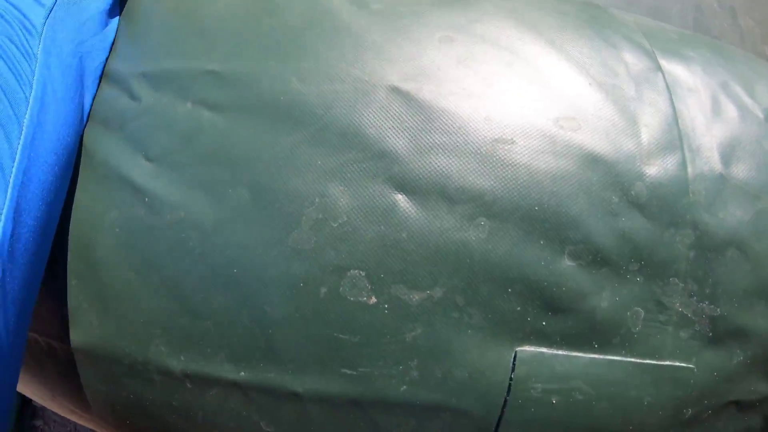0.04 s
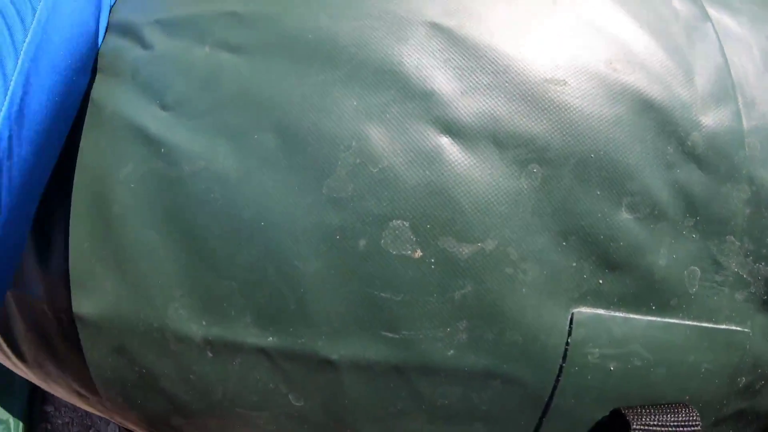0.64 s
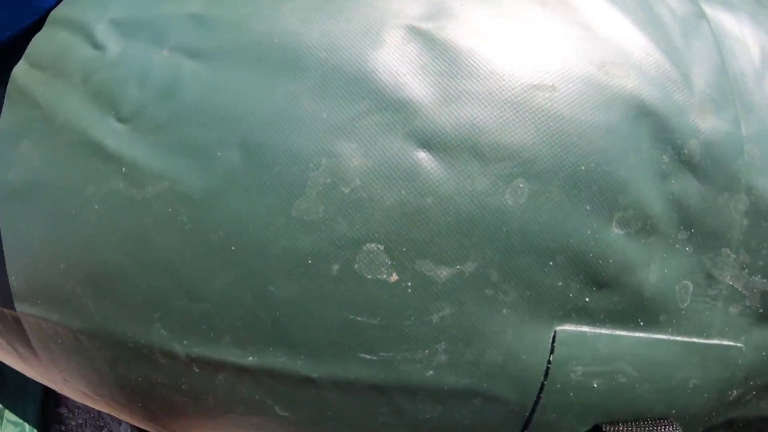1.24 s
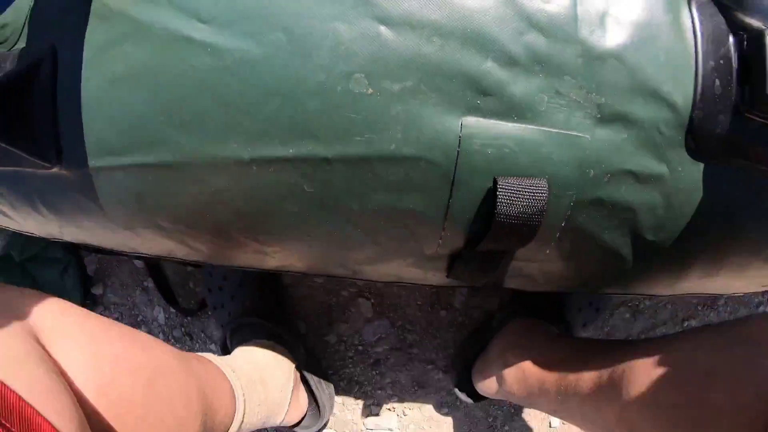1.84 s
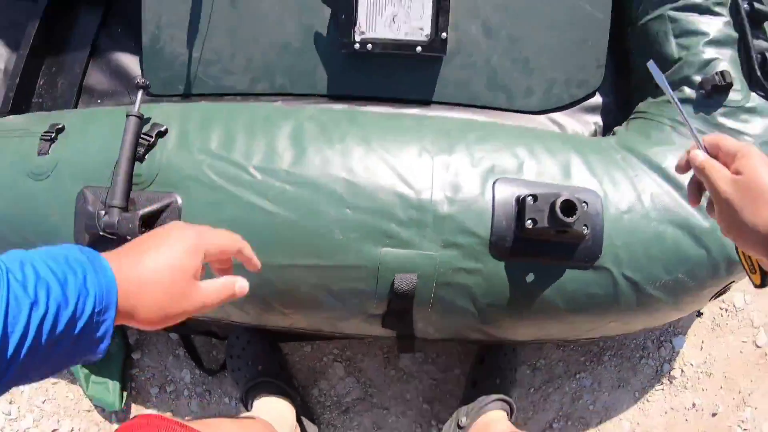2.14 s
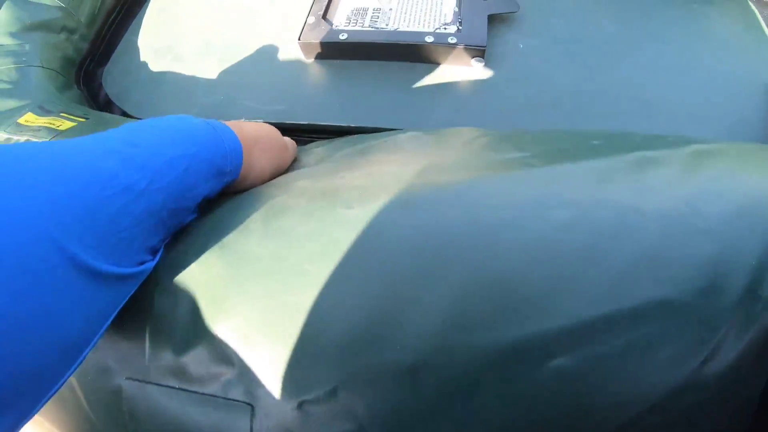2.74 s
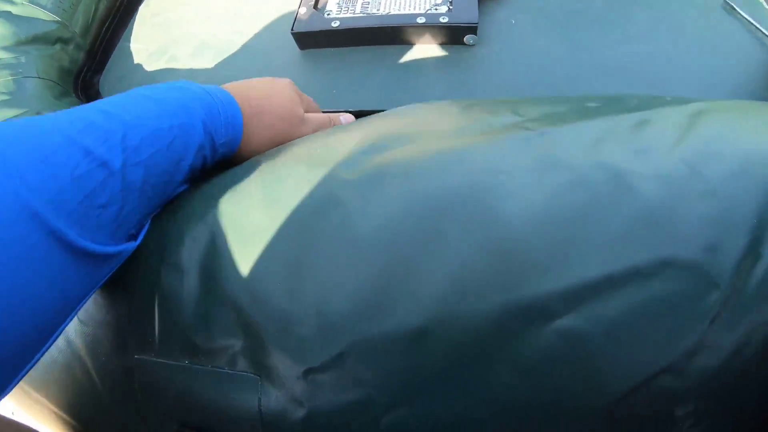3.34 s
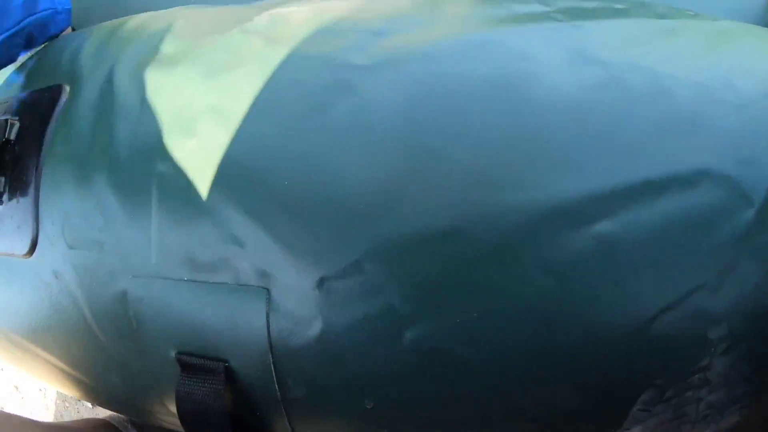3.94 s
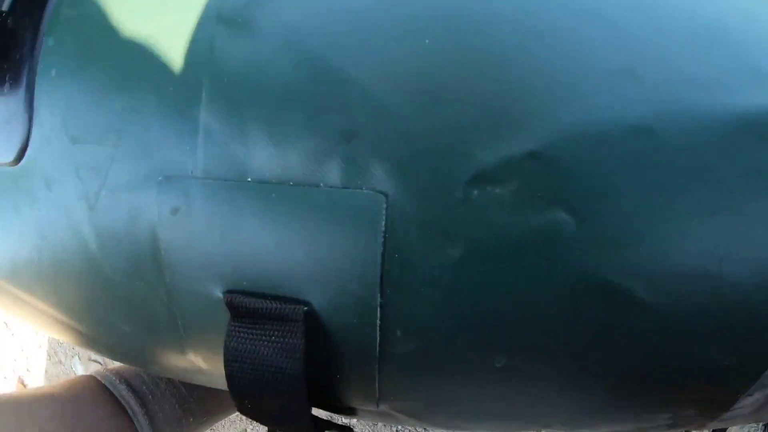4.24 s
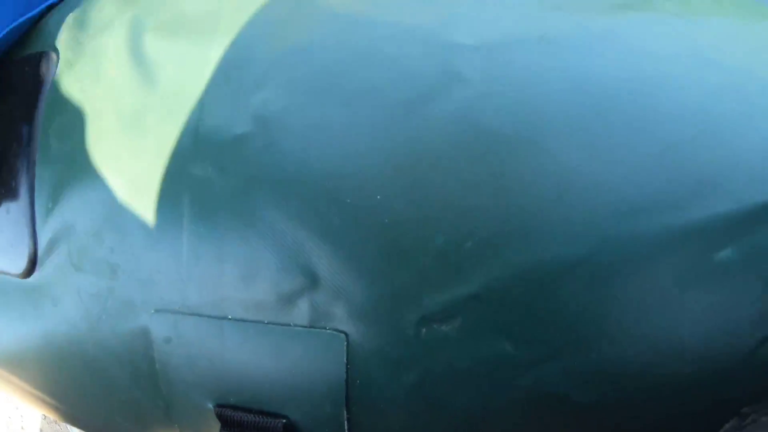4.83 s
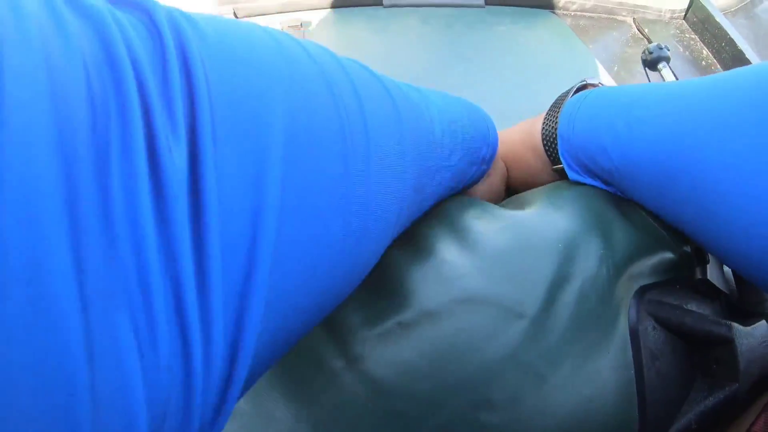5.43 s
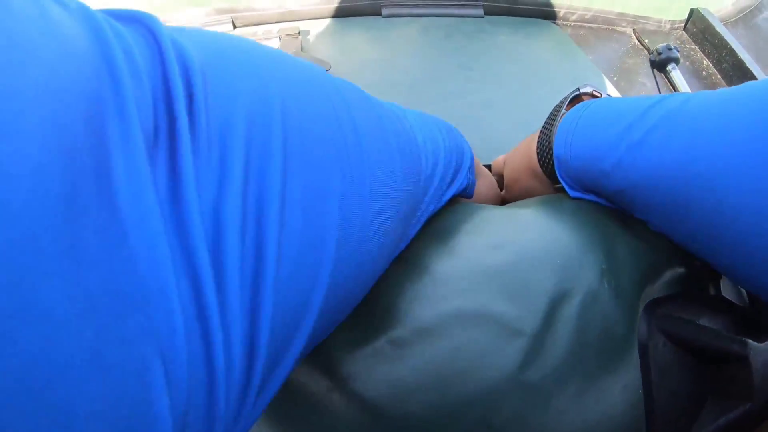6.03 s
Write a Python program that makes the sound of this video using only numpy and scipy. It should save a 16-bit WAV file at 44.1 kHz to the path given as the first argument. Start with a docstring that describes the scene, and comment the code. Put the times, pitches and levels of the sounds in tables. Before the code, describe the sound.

Close hands drag and slip on an inflatable boat, making sharp snaps, hollow thumps and skids over swishing cloth and low wind.

```python
"""Lake shore, microphone close to an inflatable boat; someone works both hands along its plastic tube.
In the first second and a half the skin drags, slips and snaps, and the air inside booms. Sleeves swish,
arms bump the tube, and the sound opens from mono to stereo just before a faint squeak at 2.7 s. Hard snaps
and a surge of low rumble come at 3.2 s, a long skid at 4.6 s, a creak at 5.2 s. The last bumps and snaps
are in mono again. Wind rumbles on the microphone throughout."""
import sys
import numpy as np
from scipy import signal
from scipy.io import wavfile

SR = 44100
rng = np.random.default_rng(int(sys.argv[2]) if len(sys.argv) > 2 else 0)


def dump(signal):
    """Clip the signal to [-1, 1] and save it as 16-bit WAV at the path in sys.argv[1]."""
    limited = np.clip(np.atleast_2d(signal).T, -1, 1)
    pcm = np.round(limited * 32767).astype(np.int16)
    wavfile.write(sys.argv[1], SR, pcm)


N = 272538

# the taut skin snaps or is tapped: start_s, level_db, favoured_hz, crack_db, slip_s
SNAPS = [(0.0293, -0.5, 1240, -10, 0.0036), (0.034, 2.5, 1370, -32, 0.0042), (0.205, -25.5, 1110, 5, 0.001),
         (0.288, -13.5, 1170, -12.5, 0.0074), (0.474, -19, 1060, -7.5, 0.0015), (.6605, -23, 840, -7, .001),
         (0.9938, -0.5, 1610, -7.5, 0.0048), (1.038, -14, 1720, -4.5, 0.012),
         (1.096, -13.5, 1120, -9, 0.0023), (1.3275, -2.5, 1570, -12, 0.0044), (1.399, -24, 1610, -2, .005),
         (1.66, -31, 1700, 8, 0.003), (2.432, -17, 1130, -17, .001), (2.814, -15, 1740, -2, 0.0098),
         (2.978, -27, 4000, 6, 0.00066), (3.1929, -1.5, 1160, -8, 0.00083), (3.227, 3, 1700, -8, 0.00046),
         (3.363, -5, 1270, -18, 0.002), (3.4397, -9, 1400, -12, 0.0011), (3.655, -30, 1320, 1.5, .001),
         (3.737, -22.5, 1570, -0.5, 0.00051), (4.233, -20, 1680, -2, 0.00069),
         (4.526, -11, 1180, -10, .003), (4.539, -12.5, 1070, -4.5, .0005), (4.63, -13, 1110, -22, .002),
         (4.682, -19, 815, -19, .004), (5.533, -21.5, 600, -25, .004), (5.6735, -7.5, 1150, -15, 0.00088),
         (5.868, -12, 1160, -20, 0.00096)]
# modes of the plastic skin: pitch_hz, level_db, t60_s
SKIN_MODES = [(666, 12.5, 0.044), (835, 1.5, 0.073), (976, 4.5, 0.022), (1170, -5, 0.054),
              (1303, -0.5, 0.045), (1560, 1.5, 0.028), (1740, -4.5, 0.029), (1894, -7, 0.048),
              (2446, -2.5, 0.036), (2650, 3.5, 0.038), (3350, 7, 0.064), (3500, -3, 0.036),
              (3940, 7, 0.042), (5600, -6.5, 0.01)]
# the tube is released: start_s, level_db, favoured_hz, contact_s, tension_ratio
BOOMS = [(0.02, -12, 192, 0.0054, 0.97), (0.996, -3, 426, 0.0051, 1.02), (1.036, -14, 171, 0.0084, 0.95),
         (1.329, -6.5, 222, 0.0064, 0.99), (1.341, -9, 342, 0.0041, 0.87)]
# modes of the air-filled tube: pitch_hz, level_db, t60_s, sag_ratio
TUBE_MODES = [(168.6, -0.5, 0.34, 0.21), (340, -17, 0.43, 0.044), (362.2, 2, 0.17, 0.015),
              (562, -7.5, 0.069, .03), (633, -10.5, 0.16, 0.03), (815, -1.5, 0.043, 0.056)]
# arms bump the tube close to the microphone: time_s, level_db, pitch_hz, swing_cycles
BUMPS = [(0.034, -10, 214, 0.82), (0.081, -11, 182, 0.72), (0.122, -3.5, 233, 1.4), (0.167, -9.5, 178, 2.6),
         (0.264, -19, 246.7, 1), (0.398, -9, 225, 0.85), (0.618, -18.5, 271.6, 1.7),
         (0.665, -11, 336, 0.72), (0.714, -20.5, 281, 2), (1.04, -12.5, 253, 2.5),
         (1.109, -16, 194.4, 0.88), (1.136, -20.5, 120, 1.3), (1.23, -21, 226, 1.7), (1.458, -16, 177.5, 2),
         (1.665, -19, 313.5, 1.1), (2.047, -20.5, 120.4, 0.64), (2.129, -18, 172, 0.67),
         (2.355, -19, 119.5, 1.1), (2.404, -17.5, 157.4, 1.35), (2.684, -9, 126, 0.31),
         (2.821, -15.5, 169, 1.3), (2.984, -9, 167.5, 0.35), (3.03, -14, 170, 0.41), (3.119, -17, 128, 1.3),
         (3.2, -7.5, 271, 1.66), (3.223, -14, 244, 1), (3.267, -10.5, 263.5, 1.3),
         (3.282, -12.5, 202, 0.67), (3.333, -16.5, 133, 0.71), (3.555, -7.5, 173.8, 0.68),
         (3.658, -10, 134, 0.38), (3.742, -11, 165.1, 1.1), (4.127, -18, 174.7, 1.46),
         (4.646, -13.5, 124.2, 1.4), (4.7, -15, 128, 1.7), (4.961, -16.5, 114.6, 1.6),
         (5.191, -15.5, 137, 0.82), (5.228, -8.5, 316, 2.5), (5.236, -8.5, 161.6, 1.1),
         (5.321, -16, 145, 0.38), (5.533, -16.5, 194, 0.87), (5.673, -8.5, 276.4, 0.73),
         (5.681, -5.5, 156.5, 0.89), (5.987, -16, 148, 0.53), (6.116, -13, 112, 0.25)]
# a palm skids: fastest_s, rise_s, fall_s, level_db, centre_hz, spread_octaves, judder_hz, depth_ratio
SKIDS = [(0.141, 0.028, 0.023, -41.5, 4160, 0.44, 200, 0.3),
         (0.278, 0.034, 0.02, -42, 3900, 0.55, 110, 0.4), (0.99, 0.013, 0.0093, -24, 1780, 0.48, 204, 0.4),
         (0.988, 0.0091, 0.008, -37.5, 7800, 0.12, 160, 0.3),
         (0.9959, 0.0037, 0.0044, -21, 1690, 0.1, 220, 0.05),
         (1.332, 0.0064, 0.04, -34.5, 1500, 0.48, 105, 0.3),
         (2.259, 0.083, 0.021, -35, 1630, 0.96, 92, 0.04), (2.25, 0.036, 0.028, -30, 1860, 0.4, 136, 1),
         (2.801, 0.025, 0.015, -44, 2350, 0.29, 110, .6), (3.571, 0.022, 0.028, -45, 3500, 0.63, 103, 0.1),
         (3.99, 0.054, 0.04, -48.5, 2550, 0.18, 110, 0.4),
         (4.546, 0.0075, 0.018, -37.5, 2480, 0.28, 145, 0.4), (4.65, 0.14, 0.064, -27, 400, 0.44, 61, 0.56),
         (4.63, 0.073, 0.088, -36.5, 1110, 0.4, 70, 0.6), (4.606, 0.05, 0.034, -43, 3280, 0.48, 110, 0.3),
         (5.151, 0.025, 0.026, -38.5, 2580, 0.44, 120, 0.2), (5.199, 0.037, 0.067, -37, 380, 0.5, 90, 0.8),
         (5.205, 0.054, 0.065, -36.5, 1270, 0.26, 106, 0.6),
         (5.214, 0.032, 0.031, -42, 2800, 0.4, 180, 0.6), (5.677, 0.005, 0.025, -22, 424, 0.59, 150, 0.5),
         (5.68, 0.015, 0.034, -38, 2020, 0.57, 156, 0.2)]
# skin creeps under a palm: start_s, end_s, level_db, first_hz, last_hz
GROANS = [(0.276, 0.301, -10.5, 289, 257), (0.832, 0.864, -28, 289, 280), (0.93, 0.957, -28, 387, 344),
          (0.975, 1, -13, 323, 375), (1.262, 1.315, -34, 173, 213), (1.27, 1.336, -30.5, 291, 362),
          (1.565, 1.62, -29, 160, 186), (1.58, 1.645, -29.5, 222.5, 286), (3.125, 3.2, -29.5, 233, 315),
          (4.672, 4.685, -21, 313, 275)]
# short bright bursts: single wrinkles flick over, and the hard snap at 3.227 s rings brightly: start_s,
# level_db, centre_hz
TICKS = [(0.9945, -31, 7800), (1.151, -39, 7950), (2.807, -36, 9500), (3.009, -31, 4020),
         (3.2274, -17, 3600), (3.755, -38, 7000), (4.177, -34.5, 3670), (4.586, -29, 4230)]
# weight comes onto a hand and goes off again: peak_s, length_s, flex_db, drag_db
PRESSES = [(-0.01, 0.078, -12.5, -28.5), (0.133, 0.27, -28, -47.5), (0.291, 0.038, -20.5, -40.5),
           (0.635, 0.74, -32.5, -45), (0.94, 0.066, -45, -37), (1.082, 0.13, -28, -44),
           (1.384, 0.13, -31, -48.5), (1.533, 0.082, -36, -71), (2.455, 0.089, -31.5, -39),
           (2.755, 0.41, -32.5, -41), (3.216, 0.058, -23, -38.5), (3.409, 0.17, -31.5, -72),
           (3.773, 0.095, -32.5, -50), (4.423, 0.37, -39.5, -44.5), (4.665, 0.24, -28.5, -36.5),
           (4.976, 0.19, -36, -43.5), (5.232, 0.13, -24, -33), (5.636, 0.4, -39.5, -43.5),
           (5.89, 0.14, -29, -43.5), (6.105, 0.15, -28, -42.5)]
# spectra of the flexing tube, the dragging hand and the sleeves: frequency_hz, relative_db
FLEX_SPECTRUM = [(70, -40), (110, 0), (160, -1), (240, 1), (350, -3.5), (450, -16.5), (620, -17.5),
                 (800, -58)]
DRAG_SPECTRUM = [(350, -8), (520, 11), (680, -2.5), (850, 0), (1200, -1), (1650, -5.5), (2200, -5),
                 (3000, -9), (4200, -21), (7000, -27.5)]
SWISH_SPECTRUM = [(1500, -14), (2400, -11), (3200, 18.5), (4000, -3), (5200, 10.5), (6400, -9),
                  (7300, -4.5), (8400, -4), (9400, -3.5), (10500, -9), (13000, -20.5), (15000, -44)]
# an arm sweeps along the tube: fastest_s, length_s, level_db
SWEEPS = [(0.56, 0.16, -50), (0.915, 0.17, -42), (1.3, 0.091, -58), (1.87, 0.1, -52.5), (2.26, 0.041, -52),
          (2.6, 0.093, -44.5), (2.79, 0.13, -48), (2.99, 0.075, -46), (3.19, 0.089, -47.5),
          (3.48, 0.26, -52), (3.96, 0.15, -51.5), (4.38, 0.68, -52), (4.57, 0.3, -48), (4.78, 0.068, -49),
          (4.99, 0.17, -42), (5.21, 0.11, -44), (5.62, 0.037, -50.5), (6.06, 0.2, -47.5)]
# a hand or an arm holds still: start_s, end_s, drag_change_db, swish_change_db
PAUSES = [(1.135, 1.274, -7.5, 1.5), (1.461, 1.75, -6, -9), (3.61, 3.888, -5.5, -15),
          (5.725, 5.87, -11, -0.5)]
# course of the cloth's squeak: time_s, pitch_hz, level_db
SQUEAK = [(2.65, 5000, -84), (2.685, 5200, -51), (2.735, 5370, -49), (2.77, 5700, -57), (2.81, 5820, -53),
          (2.83, 5800, -80)]
# strength of the wind on the microphone: time_s, relative_db
BREEZE = [(0.0, -50), (1.72, -44.5), (2.65, -34.5), (3.35, -36.5), (4.08, -38), (4.45, -39), (4.68, -31),
          (5.08, -37), (5.23, -24), (5.36, -42), (5.61, -38), (5.87, -37.5), (6.02, -41), (6.18, -39)]
# spectrum of the wind's rumble: frequency_hz, relative_db
WIND_SPECTRUM = [(15, 1.5), (25, -2), (45, -7.5), (65, 2.5), (100, -11), (140, -2.5), (250, -83)]
# low rumble swells, opposite in left and right: peak_s, level_db
LOW_SURGES = [(2.3, -42), (3.2, -23), (3.78, -38), (5.25, -39)]
# likeness of the microphone's left and right ports: frequency_hz, correlation_ratio
PORT_LIKENESS = [(25, 0.97), (160, 1), (350, 1), (650, 0.48), (1400, 0.21), (2800, 0.66), (5500, 0.06),
                 (9000, 0), (14000, 0)]
# peaks and dips of the recorder's mono channel: centre_hz, width_hz, gain_db
MONO_COLOUR = [(437, 69, -4.5), (1860, 94, 2.5), (2295, 370, -3.5), (3850, 1040, -2), (4400, 420, 2.5),
               (6300, 890, -8), (8650, 490, 5.5), (9590, 3040, -11)]


def snaps(slip_db=-4, crack_s=0.0023, crack_hz=3400, skin_db=-17.5, shiver_db=-19, shiver_s=0.021):
    """A swelling slip ends in a snap: a short crack, then the skin rings and its wrinkles shiver."""
    out, lead = np.zeros((2, N)), round(.028 * SR)
    t = np.arange(-lead, SR // 8) / SR
    for s, db, favoured_hz, crack_db, slip_s in SNAPS:
        slip = from_db(slip_db) * np.exp(-abs(t) / (slip_s + 1e-6))
        envelope = np.where(t < 0, slip, np.exp(-abs(t) / crack_s))
        mid, side, chatter = rng.standard_normal((3, len(t))) * envelope
        body = from_db(skin_db) * skin((t == 0) + 0.045 * chatter, favoured_hz)
        crack = band(stereo(mid, side, crack_hz), 350, "high")
        crack = from_db(crack_db) * band(crack, crack_hz, "low", order=1)
        wrinkles = rng.standard_normal((2, len(t))) * (t >= 0) * np.exp(-abs(t) / shiver_s)
        shiver = band(stereo(*wrinkles, favoured_hz), [favoured_hz * 0.66, favoured_hz * 0.95], "band")
        add(out, s + t[0], from_db(db) * band(body + crack + from_db(shiver_db) * shiver, 3640, "low"))
    return out


def skin(force, favoured_hz, reach_octaves=0.4):
    """The skin rings most in the modes near a favoured pitch; its tension varies from touch to touch."""
    out, tension = 0, 1 + rng.normal(0, .007)
    for k, (hz, db, t60_s) in enumerate(SKIN_MODES):
        share = 1 / (1 + (np.log2(hz / favoured_hz) / reach_octaves) ** 2)
        mode = (-1) ** k * from_db(rng.normal(0, 1.2)) * ring(force, hz * tension, t60_s)
        side = rng.choice([-1, 1]) * np.gradient(mode) * SR / (2 * np.pi * hz)   # one port leads
        out = out + from_db(db) * share * stereo(mode, side, hz)
    return out


def booms(reach_octaves=0.92, relax_s=0.0312):
    """The air in the tube rings near the contact's pitch, sinking and wavering as the skin relaxes."""
    out, t = np.zeros(N), np.arange(SR // 2) / SR
    for s, db, favoured_hz, contact_s, tension in BOOMS:
        for hz, mode_db, t60_s, sag in TUBE_MODES:
            share = 1 / (1 + (np.log2(hz / favoured_hz) / reach_octaves) ** 4)
            envelope = np.minimum(t / contact_s, 1) * from_db(-60 * t / t60_s)
            waver = .016 * drift(60)[:len(t)]
            bend = tension + sag * (np.exp(-t / relax_s) - .5) + waver
            tone = np.sin(2 * np.pi * hz * np.cumsum(bend) / SR)
            add(out, s - contact_s / 2, from_db(db + mode_db) * share * envelope * tone)
    return out


def bumps(sag=0.129, lean=0.36, heave=0.67, heave_hz=60):
    """A soft arm dents the tube: a swing or two that sinks in pitch, over one slow heave."""
    out = np.zeros(N)
    for (s, db, hz, swings), phase in zip(BUMPS, rng.uniform(0, 2 * np.pi, len(BUMPS))):
        t = np.arange(-round(min(s, .04) * SR), round(.08 * SR)) / SR
        age = t * hz / (.38 * swings)
        skewed_age = age * (1 - lean * np.tanh(age))   # quick rise, slower fall
        swell = 1 / np.cosh(np.clip(skewed_age, -50, 50))
        turns = np.cumsum(hz * (1 - sag * np.tanh(age))) / SR
        slow = 2 * np.pi * heave_hz * t
        push = heave * (150 / hz) ** 2 * slow * np.exp(-slow ** 2 / 2)   # low contacts shift most air
        add(out, s + t[0], from_db(db) * (swell * np.sin(2 * np.pi * turns + phase) + push))
    return band(out, 28, "high")


def skids(ringing=0.24, slips_per_s=450):
    """A palm speeds up and tapers off, sticking and letting go in judders that partly ring the skin."""
    out, size = np.zeros((2, N)), SR // 2
    for s, rise_s, fall_s, db, hz, octaves, judder_hz, depth in SKIDS:
        start = max(s - 2 * rise_s, 0)
        t = start + np.arange(size) / SR - s
        speed = np.exp(-abs(t / np.where(t < 0, rise_s, fall_s)) ** 3)
        cycle = np.cumsum(judder_hz * from_db(7.2 * drift(60)[:size])) / SR % 1
        roughness = grains(slips_per_s, 0.67, size) + rng.standard_normal((2, size))
        force = roughness * np.exp(-3 * depth * cycle)
        edges_hz = [hz / 2 ** octaves, hz * 2 ** octaves]
        rasp = rms_one(band(stereo(*force, hz), edges_hz, "band"))
        rung = rms_one(band(skin(force[0], hz), edges_hz, "band"))
        above_lowest_mode = hz > SKIN_MODES[0][0]
        add(out, start, from_db(db) * speed * rms_one(rasp + ringing * above_lowest_mode * rung))
    return out


def groans(waver=0.026, shake_db=4.5, overtone_db=-22):
    """Fast, even sticking and slipping sings a low gliding note that swells and fades."""
    out = np.zeros(N)
    for start, end, db, first_hz, last_hz in GROANS:
        size = round((end - start) * SR)
        progress = np.linspace(0, 1, size)
        hz = (first_hz + (last_hz - first_hz) * progress) * (1 + waver * drift(66)[:size])
        phase = 2 * np.pi * np.cumsum(hz) / SR
        swell = np.sqrt(abs(np.sin(np.pi * progress))) * from_db(db + shake_db * drift(60)[:size])
        add(out, start, swell * (np.sin(phase) + from_db(overtone_db) * np.sin(2 * phase)))
    return out


def creak(start_s=5.203, gap_s=0.005, slowing=1.13, slip_s=0.002, rasp_db=-26.5, ring_db=-42):
    """A gripping hand halts in nine rasping slips, each gap longer; every slip rings the skin."""
    out, t = np.zeros((2, N)), np.arange(SR // 20) / SR
    favoured_hz, edges_hz = 1700, (1000, 3900)
    s, slip = start_s, np.exp(-(t / slip_s - 1) ** 2)
    for k in range(9):
        force = rng.standard_normal((2, len(t)))
        rasp = rms_one(band(stereo(*force, favoured_hz), edges_hz, "band", order=3))
        rung = rms_one(band(skin(force[0] * slip, favoured_hz), edges_hz, "band", order=3))
        add(out, s, from_db(rasp_db) * rasp * slip + from_db(ring_db) * rung)
        s += gap_s * slowing ** k
    return out


def ticks(decay_s=0.0018, width_ratio=1.23):
    """A very short, bright burst: a single wrinkle flicking over, or the bright ring of a snap."""
    out, t = np.zeros((2, N)), np.arange(SR // 50) / SR
    for s, db, hz in TICKS:
        noise = stereo(*rng.standard_normal((2, len(t))), hz)
        burst = rms_one(band(noise, [hz / width_ratio, hz * width_ratio], "band"))
        add(out, s, from_db(db) * burst * np.exp(-t / decay_s))
    return out


def tube_flex(flexing, resting_db=-42.5):
    """The tube flexes with a low, grainy rub under hands that never quite leave it."""
    rub = friction(FLEX_SPECTRUM, slips_per_s=120, grainy=0.69, flicker_db=4)
    return np.hypot(flexing, from_db(resting_db)) * rub


def hand_drag(dragging, pause_db, resting_db=-46.5):
    """Hands drag over the plastic with a midrange rub, louder at each press."""
    rub = friction(DRAG_SPECTRUM, slips_per_s=500, grainy=0.22, flicker_db=3)
    return np.hypot(dragging, from_db(resting_db + pause_db)) * rub


def sleeves(pause_db, resting_db=-56, sheen_db=1.5, crease_db=-15):
    """Cloth hisses over the tube and stirs its wrinkles; the louder the sweep, the duller the hiss."""
    resting = from_db(resting_db)
    sweeping = np.hypot(swells(SWEEPS, rise_share=0.62), resting * from_db(pause_db))
    hiss = friction(SWISH_SPECTRUM, slips_per_s=5100, grainy=0.04, flicker_db=1.5, judder_db=1.3)
    swish = sweeping * hiss
    treble_gain = from_db(sheen_db) * (sweeping / resting) ** -0.13
    swish = swish + (treble_gain - 1) * band(swish, 6100, "high", order=1)
    return swish + sweeping * from_db(crease_db) * creases()


def creases(flicks_per_s=22, favoured_hz=2800, click_gain=0.2):
    """Small wrinkles flick over at random, clicking and ringing the skin; rms 1."""
    flicks = grains(flicks_per_s, 1.5, N)
    clicks = band(stereo(*flicks, favoured_hz), [1500, 6500], "band", order=1)
    return rms_one(rms_one(skin(flicks[0], favoured_hz)) + click_gain * rms_one(clicks))


def squeak(lower_ratio=0.6, lower_db=2, wobble_hz=200):
    """Cloth sliding on taut plastic sings faintly at two unsteady pitches."""
    hz, db = in_time(SQUEAK)
    t, turns = np.arange(N) / SR, np.cumsum(hz) / SR
    wobble = band(rng.standard_normal((2, N)) + 1j * rng.standard_normal((2, N)), wobble_hz, "low")
    upper, lower = np.real(wobble * np.exp(2j * np.pi * turns * np.array([[1], [lower_ratio]])))
    sliding = (t > SQUEAK[0][0]) & (t < SQUEAK[-1][0])
    return from_db(db + 3 * drift(40)) * sliding * (rms_one(upper) + from_db(lower_db) * rms_one(lower))


def rumble(flexing, wander_db, wind_db=5, heave_db=-2):
    """Wind on the microphone and the heave of the flexing tube share one deep rumble."""
    breeze = from_db(in_time(BREEZE)[0] + wind_db + wander_db)
    noise = friction(WIND_SPECTRUM, slips_per_s=140, grainy=0.4, judder_db=2, judder_hz=12)
    return np.hypot(breeze, from_db(heave_db) * flexing) * noise


def low_surges(top_hz=110, attack_s=0.025, release_s=0.27):
    """Low rumble swells, opposite in left and right; each comes fast and dies slowly."""
    t = np.arange(N) / SR
    low_noise = rms_one(band(band(rng.standard_normal(N), 15, "high"), top_hz, "low"))
    strength = sum(from_db(db) * np.exp(-abs(t - s) / np.where(t < s, attack_s, release_s))
                   for s, db in LOW_SURGES)
    return strength * low_noise * np.array([[1], [-1]])


def friction(spectrum, slips_per_s, grainy, flicker_db=0, judder_db=0, judder_hz=9):
    """Slips over smooth hiss, in third-octave bands that flicker apart and judder together; mid rms 1."""
    forces = [np.sqrt(grainy) * grains(slips_per_s, 4.2, N)
              + np.sqrt(1 - grainy) * rng.standard_normal((2, N)) for _ in range(2)]
    out, edges_hz = 0, 16 * 2 ** (np.arange(31) / 3)
    for k, (low, high) in enumerate(zip(edges_hz, edges_hz[1:])):
        hz, flicker = np.sqrt(low * high), drift(19.2)
        if spectrum[0][0] < high and low < spectrum[-1][0]:
            gain = from_db(at_hz(spectrum, hz) + flicker_db * flicker)
            out = out + gain * stereo(*band(forces[k % 2], [low, high], "band"), hz)
    out = out * from_db(judder_db * drift(judder_hz))
    return out / np.std(out.mean(axis=0))


def grains(per_s, spread_db, size):
    """Tiny slips at random times, of uneven strength; mid and side share the times."""
    born = rng.random(size) < per_s / SR
    strength = from_db(spread_db * np.minimum(rng.exponential(1, size), 4))
    return rms_one(born * strength * rng.standard_normal((2, size)))


def swells(rows, rise_share):
    """Gain of movements (peak_s, length_s, level_db) that swell and ebb; their powers add."""
    t, power = np.arange(N) / SR, 0
    for s, length_s, db in rows:
        width_s = length_s * np.where(t < s, rise_share, 1 - rise_share)
        power = power + from_db(db) ** 2 * np.exp(-((t - s) / width_s) ** 2)
    return np.sqrt(power)


def pauses(edge_s=0.021):
    """Changes in dB of the resting drag and swish while a hand or an arm holds still."""
    t = np.arange(N) / SR
    return sum(np.outer(changes_db, np.tanh((t - start) / edge_s) - np.tanh((t - end) / edge_s)) / 2
               for start, end, *changes_db in PAUSES)


def stereo(mid, side, hz):
    """The microphone's two ports hear the bass alike and the treble apart."""
    alike = at_hz(PORT_LIKENESS, hz)
    return mid + np.sqrt((1 - alike) / (1 + alike)) * np.array([side, -side])


def ring(force, hz, t60_s):
    """One mode: a unit click starts a decaying sine of height 1."""
    r, w = from_db(-60 / (t60_s * SR)), 2 * np.pi * hz / SR
    return signal.lfilter([0, np.sin(w)], [1, -2 * r * np.cos(w), r * r], force + 1e-18)


def drift(rate_hz, hop=40):
    """Smooth random wander with rms 1."""
    r = np.exp(-2 * np.pi * rate_hz * hop / SR)
    slow = signal.lfilter([1], [1, -2 * r, r * r], rng.standard_normal(N // hop + 2002))[2000:]
    return np.interp(np.arange(N) / hop, np.arange(len(slow)), rms_one(slow))


def band(x, hz, kind, order=2):
    """Butterworth filter."""
    sos = signal.butter(order, np.clip(hz, 10, .45 * SR), kind, fs=SR, output="sos")
    return signal.sosfilt(sos, x + 1e-18)


def at_hz(points, hz):
    """Read a spectrum on a log-frequency axis."""
    frequencies, values = np.transpose(points)
    return np.interp(np.log(hz), np.log(frequencies), values)


def in_time(rows):
    """Each column of a curve at every sample."""
    s, *columns = np.transpose(rows)
    return [np.interp(np.arange(N) / SR, s, column) for column in columns]


def add(track, s, sound):
    """Mix a sound into a track from time s."""
    at = max(0, round(s * SR))
    track[..., at:at + sound.shape[-1]] += sound[..., :max(0, N - at)]


def from_db(db):
    """Decibels to gain."""
    return 10 ** (np.asarray(db) / 20)


def rms_one(x):
    """Scale to rms 1."""
    return x / np.sqrt(np.mean(x ** 2) + 1e-20)


def scene(unsteady_db=1.5, press_rise_share=0.61):
    """At the microphone: close contacts on the tube, rubbing hands and sleeves, wind underneath."""
    still_hands_db, still_arms_db = pauses()
    weight = drift(2.4)   # the weight on the hands shifts
    flexing = swells([(s, length_s, db) for s, length_s, db, _ in PRESSES], press_rise_share)
    dragging = swells([(s, length_s, db) for s, length_s, _, db in PRESSES], press_rise_share)
    low_end = rumble(flexing, wander_db=weight)
    hands = from_db(unsteady_db * weight) * (tube_flex(flexing) + hand_drag(dragging, still_hands_db))
    bed = low_end + hands + sleeves(still_arms_db) + low_surges()
    return bumps() + booms() + groans() + snaps() + ticks() + skids() + creak() + squeak() + bed


def record(dry, stereo_from_s=2.29, stereo_to_s=5.312, tick_db=-33, step_db=-22, cutoff_hz=15000):
    """The recorder goes from mono to stereo and, with a tick, back; peaks are rounded, the top is cut."""
    mono = dry.mean(axis=0)
    for hz, width_hz, db in MONO_COLOUR:
        mono = mono + (from_db(db) - 1) * signal.lfilter(*signal.iirpeak(hz, hz / width_hz, fs=SR), mono)
    t = np.arange(N) / SR
    wide = np.clip(np.minimum(t - stereo_from_s, stereo_to_s - t) / .01, 0, 1)
    heard = wide * dry + (1 - wide) * mono
    tick = from_db(step_db) + from_db(tick_db) * np.cos(2 * np.pi * 13000 * t[:200])
    add(heard, stereo_to_s - .006, tick * np.exp(-t[:200] / .0002))
    rounded = 1.6 * np.tanh(heard / 1.6)
    return signal.sosfilt(signal.ellip(10, .1, 80, cutoff_hz, fs=SR, output="sos"), rounded)


dry = scene()
out = record(dry)
dump(out)
```